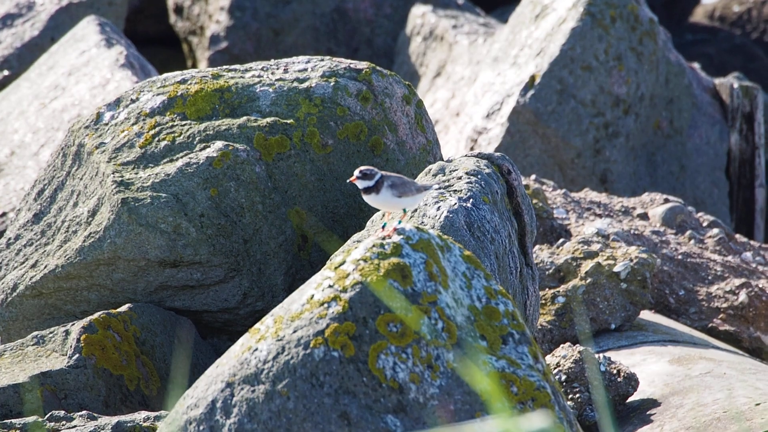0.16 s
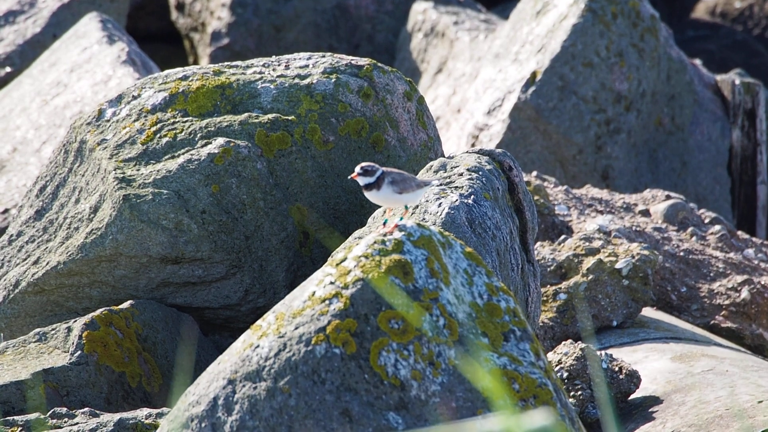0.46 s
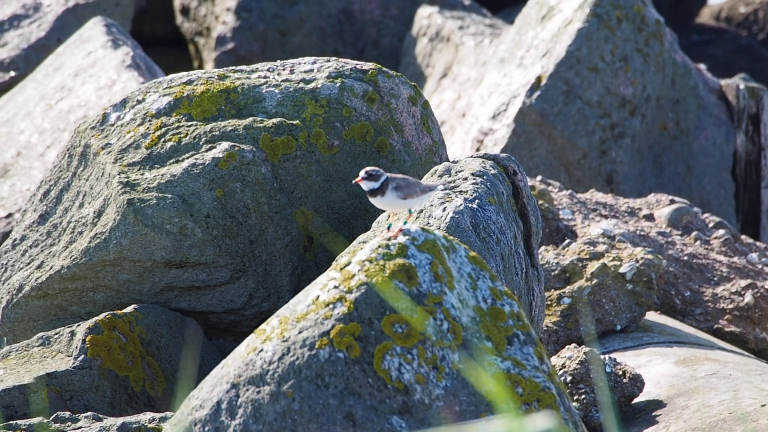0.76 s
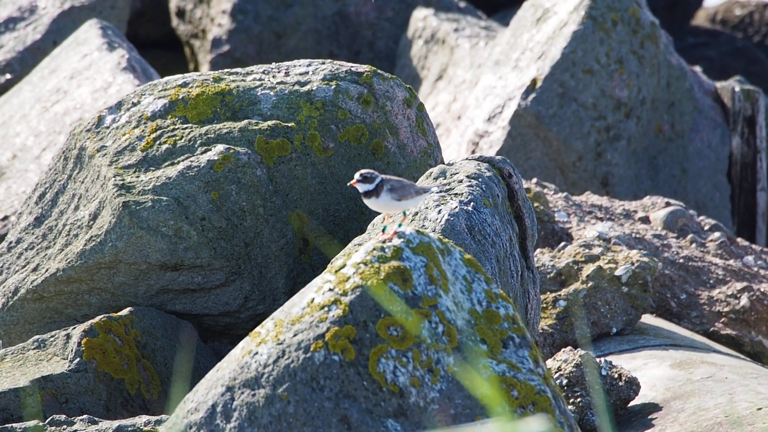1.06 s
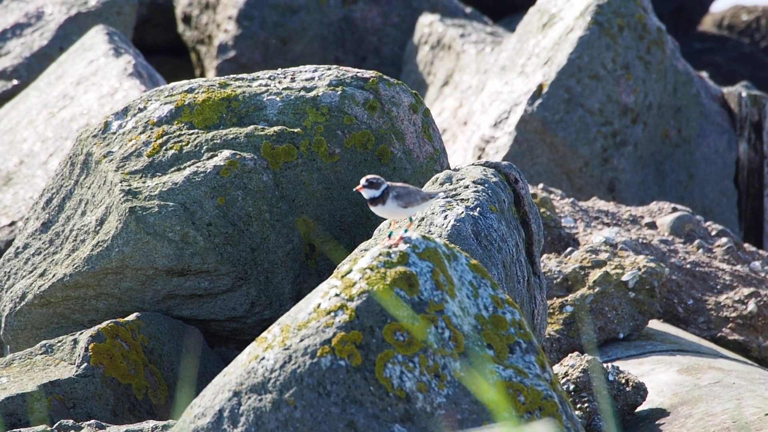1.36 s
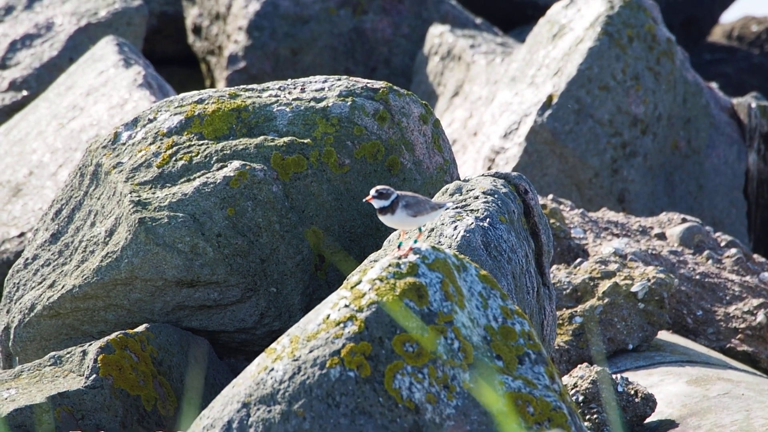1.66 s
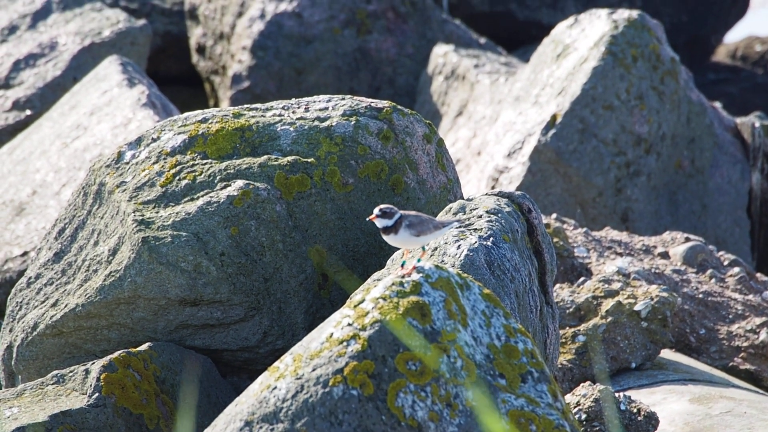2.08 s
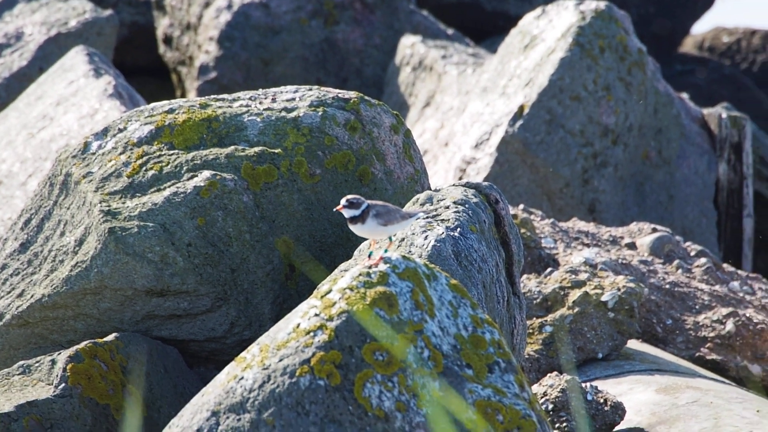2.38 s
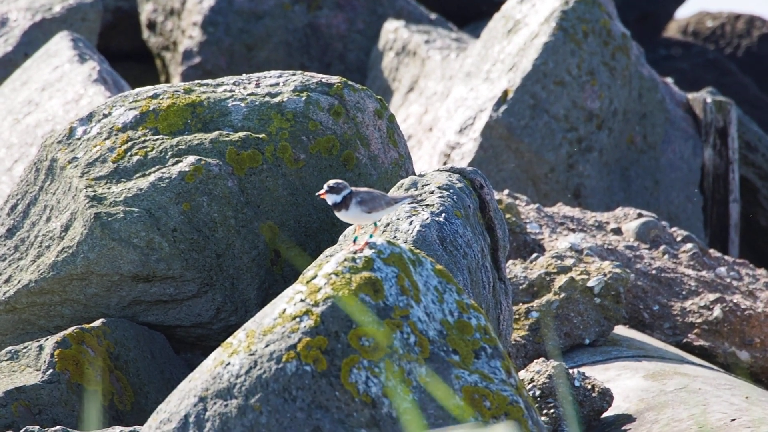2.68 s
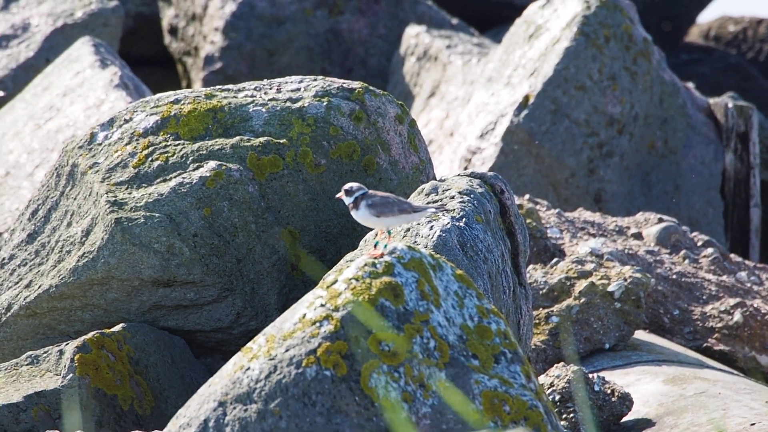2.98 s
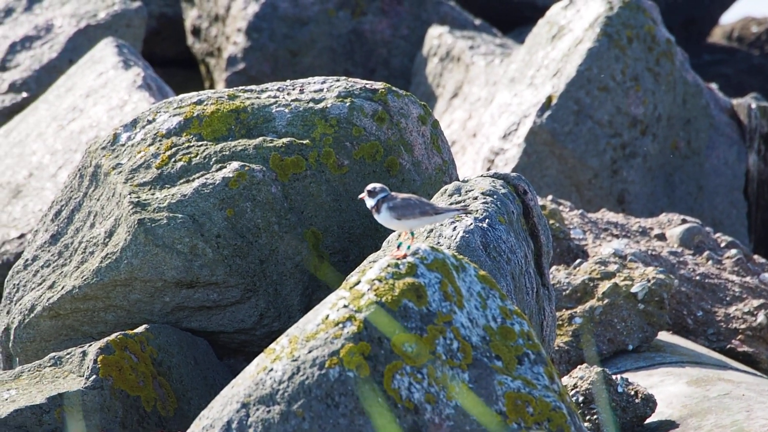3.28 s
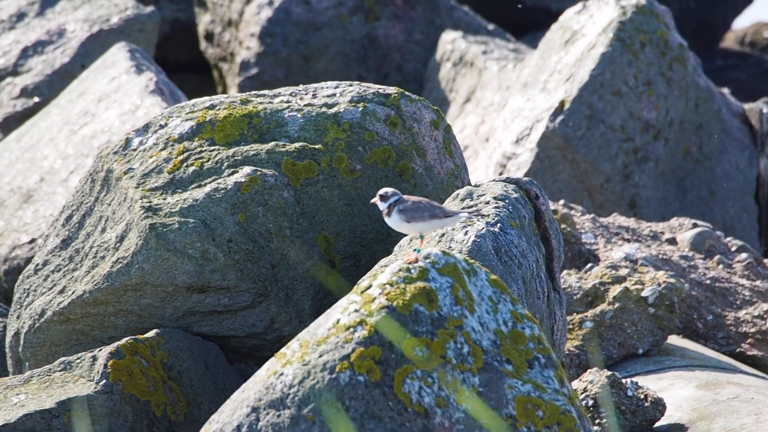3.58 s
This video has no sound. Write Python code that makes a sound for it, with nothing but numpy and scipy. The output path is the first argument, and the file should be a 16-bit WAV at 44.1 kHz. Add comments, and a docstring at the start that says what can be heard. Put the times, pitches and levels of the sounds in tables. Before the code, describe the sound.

Five clear, thin plover whistles, evenly spaced, above soft water wash and light wind bumps.

```python
"""A small plover on a rock whistles five alike calls, a few metres from a pair of microphones.
Each call is a gliding sine with a faint second partial; the stones around return delayed copies.
Water washes among the rocks: bands of noise that swell, with ticks and small drops as dying rings.
Light wind bumps the two microphone ports: low noise in gusts, with two single thumps."""
import sys
import numpy as np
from scipy import signal
from scipy.fft import rfft, irfft
from scipy.io import wavfile
from scipy.ndimage import uniform_filter1d

SR = 44100
rng = np.random.default_rng(int(sys.argv[2]) if len(sys.argv) > 2 else 0)


def output_pcm(signal):
    """Save a mono or channel-first signal as 16-bit PCM at the path in sys.argv[1].

    Samples are clipped to [-1, 1] before scaling.
    """
    pcm = np.clip(np.atleast_2d(signal).T, -1, 1) * 32767
    wavfile.write(sys.argv[1], SR, np.round(pcm).astype(np.int16))


N = 164934  # samples

# Wind gusts on the ports: start_s, level_db (before a 3 dB lift), left_minus_right_db
WIND_GUSTS = [(.86, -63, 4), (1.9, -71.5, -7), (2.3, -54.5, 7), (2.44, -61, -3), (2.53, -54, 16),
              (2.62, -67, 0), (2.82, -55.5, 8), (2.9, -46.5, 22), (3.11, -51.5, 20), (3.17, -60, 8),
              (3.5, -68, -2), (3.62, -55, -10)]
# Single bumps of wind: start_s, level_db (louder port, at the start), pitch_hz, left_minus_right_db
WIND_THUMPS = [(0.449, -30.5, 72, 22), (3.549, -35.5, 66, -16)]
# Colour of the water: pitch_hz, relative_level_db (per Hz)
WASH_COLOUR = [(25, -19), (125, -3), (205, -1), (260, -7), (350, -13.5), (540, -5), (790, -14.5),
               (1000, -9.5), (1300, -12), (1640, -20.5), (1950, -11.5), (2320, -18), (2950, -15),
               (5700, -19.5), (8000, -24.5), (15700, -30.5)]
# Swell of the water, each level used relative to its column mean: time_s, treble_db, middle_db
WASH_SWELL = [(.16, -58.5, -58.5), (.3, -58, -55.5), (.37, -58, -55.5), (1., -61, -56), (2.05, -58, -55.5),
              (2.9, -60.5, -56.5), (3.74, -58.5, -56)]
# How alike the water is at both microphones: pitch_hz, likeness (0-1)
WASH_LIKENESS = [(60, 1), (150, .68), (640, 0.46), (1400, 0.06), (3100, 0)]
# Side on which the water is louder: pitch_hz, left_minus_right_db
WASH_LEAN = [(200, -1), (700, -1.5), (1300, 2.1), (4400, 2), (15000, -2.2)]
# Ticks and drops that stand out: start_s, level_db (at the start), pitch_hz, left_minus_right_db, ring_cycles
WATER_TICKS = [(0.2382, -32, 4000, 17, 2.2), (.2624, -36, 6000, 3.5, 3), (0.273, -36, 4100, 15, 4.6),
               (0.295, -32, 4330, 15, 2.1), (.3060, -40, 3500, 11, 8.3), (0.317, -42, 5630, 3, 31),
               (.3960, -39, 5500, 1.5, 2.5), (0.4253, -38, 3280, -2, 17), (1.549, -36, 1560, 2, 2.6),
               (1.8336, -31.5, 5130, 6, 1.9), (2.21, -43, 1007, -4, 14), (2.5506, -35, 2910, 0, 13),
               (2.9592, -41, 2280, 0, 18), (3.1494, -42.5, 5530, 3, 9), (3.236, -47.5, 1436, 8, 12),
               (3.3904, -29.5, 3220, 11, 1.8), (3.5374, -41, 1980, 10, 7.1)]
# Turns of each call: start_s, step_up_s, first_swell_s, dip_s, second_swell_s, closing_drop_s
CALL_TURNS = [(.660, .717, .740, .755, .786, .803), (1.289, 1.350, 1.362, 1.385, 1.408, 1.432),
              (1.943, 2.004, 2.018, 2.040, 2.068, 2.092), (2.633, 2.690, 2.712, 2.730, 2.759, 2.781),
              (3.270, 3.338, 3.344, 3.362, 3.399, 3.414)]
# Pitch of each call: low_note_hz, first_swell_hz, dip_hz, second_swell_hz
CALL_PITCHES = [(2045, 2560, 2515, 2595), (2025, 2555, 2487, 2610), (2042, 2545, 2474, 2622),
                (2070, 2550, 2456, 2622), (2025, 2535, 2480, 2592)]
# Guide levels of each call, before the echoes: low_note_db, before_step_db, first_swell_db, dip_db,
# second_swell_db, second_swell_end_db, drop_db, second_partial_db (for a 2 kHz pitch)
CALL_LEVELS = [(-50, -41.5, -37, -52.5, -35.5, -39, -42, -66.5), (-52, -39.5, -38, -53, -37, -38, -41, -66),
               (-50, -40, -38, -53.5, -36, -36, -41, -64), (-47.5, -40, -36.5, -48.5, -34, -37, -42.5, -61),
               (-49.5, -38.5, -38, -54.5, -34.5, -54, -39.5, -67)]
# Paths by way of the stones, before the hollow colours them: lag_s, left_db, right_db
STONE_ECHOES = [(.0095, -1.5, -3), (0.0143, -5, -4), (.021, -20, -26), (.031, -10, -21)]
# Notches from the microphone housing: pitch_hz, width_hz, depth_db
HOUSING_NOTCHES = [(6590, 413, 12.5), (10430, 890, 13.5)]

WIND_HZ, WIND_WIDTH_HZ = 69, 48.5
WIND_PATCHY_DB = 3  # per unit of walk()
THUMP_CYCLES = 3.1
WASH_DB = -50  # rms over both channels
TICK_CRACK_DB = -15  # click in front of a tick, relative to its ring
DROPS_PER_S, DROPS_LOW_HZ, DROPS_HIGH_HZ = 260, 694, 5970
DROPS_DB, DROPS_SPREAD_DB = -57, 3.5  # level of the faintest; scale of the random lift above it
DROPS_CYCLES, DROPS_GLIDE = 5.35, .15
# A burst of fine crackle that leans left; its level is that of the faintest
CRACKLES, CRACKLE_S, CRACKLE_LENGTH_S = 36, .225, .11
CRACKLE_DB, CRACKLE_TOP_HZ = -49, 14300

SCOOP_S, SCOOP_HZ = .013, 250  # slide up into the low note
LIFT_S, LIFT_HZ, STEP_S = .022, 210, .007  # rise before the step, then the step itself
NULL_DB = -13  # brief dips in level at the step and before the drop, as when call and echo beat
DROP_S, DROP_TO_HZ, DROP_FADE_DB = .018, 1640, 11  # every call ends in a quick fall of pitch
OVERTONE_TILT_DB_PER_KHZ = -11.5  # the second partial is weaker for higher notes
WAVER, HOARSE_DB = .003, 1.5  # share of pitch, and level flutter, per unit of walk()
BEAK_DB, BEAK_HZ, BEAK_CYCLES = -45.5, 3250, 8  # a small click opens each call
BIRD_PAN_DB, RIGHT_LAG_S = 0, .00004
# A gap between the stones favours one band of the echoes
HOLLOW_HZ, HOLLOW_WIDTH_HZ, HOLLOW_CONTRAST_DB = 2230, 150, -7
WHINE_HZ, WHINE_DB = 15300, -81
START_S, OFFSET, TOP_HZ = .1565, -.0028, 15800


def undb(db):
    """Decibels to an amplitude factor."""
    return 10 ** (np.asarray(db) / 20)


def pan(x, db):
    """Two channels that differ by db, positive to the left."""
    return x * undb([[db / 2], [-db / 2]])


def walk(rate):
    """Random values 1 / rate s apart, of spread 1.2, joined by straight lines."""
    knots = rng.standard_normal(rate * 4 + 2)
    return 1.2 * np.interp(np.arange(N) * rate / SR, np.arange(rate * 4 + 2), knots)


def band(hz, width):
    """Noise in a bell-shaped band."""
    f = np.fft.rfftfreq(N, 1 / SR)
    inside = np.abs(f - hz) < 3 * width
    bell = np.exp(-((f[inside] - hz) / width) ** 2)
    spectrum = np.zeros(len(f), complex)
    spectrum[inside] = rng.standard_normal((inside.sum(), 2)) @ [1, 1j] * bell
    return irfft(spectrum, N)


def on_log(table, hz):
    """Read a two-column table along a logarithmic pitch axis."""
    pitches, values = np.array(table).T
    return np.interp(np.log(hz), np.log(np.maximum(pitches, 1)), values)


def add(out, at, db, hz, pan_db, cycles, glide, crack=0.):
    """Add a ring that decays over some cycles, its pitch rising by glide, with an optional click in front."""
    turn = np.arange(int(3 * cycles * SR / hz) + 4) * hz / SR
    ring = np.sin(2 * np.pi * turn * (1 + glide * turn / cycles)) * np.exp(-2 * turn / cycles)
    ring[1:4] += crack * np.array([1, -1, .5])
    i = int(at * SR)
    ring = ring[:N - i]
    out[:, i:i + len(ring)] += pan(ring * undb(db), pan_db)


def wind(t):
    """Low patchy rumble in gusts, unrelated on the two ports, and single bumps that ring briefly."""
    s, db, side = np.array(WIND_GUSTS).T
    ports = np.array([band(WIND_HZ, WIND_WIDTH_HZ) * undb(WIND_PATCHY_DB * walk(14)) for _ in range(2)])
    lean = undb(np.interp(t, s, side) * np.array([[.5], [-.5]]))
    lean = 2 * lean / np.hypot(*lean)  # leaning keeps the summed power
    out = ports / ports.std() * undb(np.interp(t, s, db)) * lean
    for at, db, hz, pan_db in WIND_THUMPS:
        add(out, at, db - abs(pan_db) / 2, hz, pan_db, THUMP_CYCLES, 0.)
    return out


def wash(t):
    """Moving water: noise bands a third of an octave apart that swell together and flicker alone."""
    s, treble, middle = np.array(WASH_SWELL).T
    treble = np.interp(t, s, treble - treble.mean())
    middle = np.interp(t, s, middle - middle.mean())
    out, ripple = 0, walk(8)
    for hz in 28 * 2 ** np.arange(0, 9.4, 1 / 3):
        treble_share = np.clip(np.log2(hz / 1200), 0, 1)
        swell = treble_share * treble + (1 - treble_share) * middle
        db = on_log(WASH_COLOUR, hz) + swell + .5 * ripple + .9 * walk(22)
        like = np.clip(on_log(WASH_LIKENESS, hz), -.9, .95)
        mid = np.sqrt(1 + like) * band(hz, hz / 5)
        side = np.sqrt(1 - like) * band(hz, hz / 5)
        pair = np.array([mid + side, mid - side])
        lean = undb(on_log(WASH_LEAN, hz) * np.array([[.5], [-.5]]))
        out = out + undb(db) * pair * lean
    return out * undb(WASH_DB) / out.std()


def drops():
    """Bubbles and drops as short rising rings, a few much louder; a burst of crackle and clicking ticks."""
    out = np.zeros((2, N))
    for at, pitch, size, side in rng.random((int(DROPS_PER_S * N / SR), 4)):
        hz = DROPS_LOW_HZ * (DROPS_HIGH_HZ / DROPS_LOW_HZ) ** pitch
        db = DROPS_DB - DROPS_SPREAD_DB * np.log(1 - .98 * size)
        add(out, at * N / SR, db, hz, 22 * (side - .4), DROPS_CYCLES, DROPS_GLIDE)
    for at, pitch, size in rng.random((CRACKLES, 3)):
        hz = 2000 * (CRACKLE_TOP_HZ / 2000) ** pitch
        db = CRACKLE_DB - 4 * np.log(1 - .76 * size)
        add(out, CRACKLE_S + at * CRACKLE_LENGTH_S, db, hz, 5, 4, 0.)
    for at, db, hz, pan_db, cycles in WATER_TICKS:
        add(out, at, db, hz, pan_db, cycles, .03, undb(TICK_CRACK_DB))
    return out


def among_stones(whistle):
    """The direct path to each microphone plus delayed copies, strongest near the hollow's pitch."""
    f = np.fft.rfftfreq(N, 1 / SR)

    def late(lag):
        """A delay, as a turn of phase that grows with frequency."""
        return np.exp(-2j * np.pi * f * lag)

    bell = np.exp(-((f - HOLLOW_HZ) / HOLLOW_WIDTH_HZ) ** 2)
    hollow = undb(HOLLOW_CONTRAST_DB * (1.5 - bell))
    left = late(0) * undb(BIRD_PAN_DB / 2)
    right = late(RIGHT_LAG_S) * undb(-BIRD_PAN_DB / 2)
    paths = np.array([left, right])
    for lag, left_db, right_db in STONE_ECHOES:
        paths = paths + hollow * late(lag) * undb([[left_db], [right_db]])
    return irfft(rfft(whistle) * paths, N)


def plover(t):
    """A nearly pure whistle: low note, step up, two swells, quick drop; nearby stones return it."""
    beak, whistle = np.zeros((2, N)), np.zeros(N)
    waver, flutter = 1 + WAVER * walk(150), walk(220)
    for turns, pitches, levels in zip(CALL_TURNS, CALL_PITCHES, CALL_LEVELS):
        start, step, swell1, dip, swell2, drop = turns
        low, high1, sag, high2 = pitches
        low_db, rise_db, swell1_db, dip_db, swell2_db, late_db, drop_db, upper_db = levels
        before, after, end = step - STEP_S / 2, step + STEP_S / 2, drop + DROP_S
        near = slice(int((start - .02) * SR), int((end + .02) * SR))
        now = t[near]

        pitch_points = [  # (s, Hz)
            (start, low - SCOOP_HZ), (start + SCOOP_S, low),
            (before - LIFT_S, low + 15), (before, low + LIFT_HZ), (after, high1 - 30),
            (swell1, high1), (dip, sag), (swell2, high2),
            (drop - .004, high2 - 70), (drop + .004, high2 - 240), (end, DROP_TO_HZ)]
        pitch = np.interp(now, *np.transpose(pitch_points))
        pitch = uniform_filter1d(pitch, size=130) * waver[near]

        level_points = [  # (s, dB)
            (start - .004, -120), (start + .0042, low_db - 1.5), (start + SCOOP_S, low_db),
            (step - .015, low_db + 2.5), (step - .009, rise_db), (before - .001, rise_db - 3),
            (step, rise_db + NULL_DB), (after + .00074, swell1_db - 4), (swell1, swell1_db),
            (dip - .006, dip_db - 5.5), (dip + .012, dip_db + 3),
            (swell2 - .004, swell2_db), (swell2 + .0078, swell2_db - .5), (drop - .005, late_db),
            (drop, late_db + NULL_DB), (drop + .0025, drop_db),
            (end, drop_db - DROP_FADE_DB), (end + .001, -120)]
        times, level_db = np.transpose(level_points)
        gain = np.interp(now, times, undb(level_db))
        hoarse = (now < step) | (now > drop)  # only the low note and the drop
        gain = gain * undb(flutter[near] * HOARSE_DB * hoarse)

        phase = 2 * np.pi * np.cumsum(pitch) / SR
        upper = undb(upper_db + OVERTONE_TILT_DB_PER_KHZ * (pitch - 2000) / 1000)
        upper = upper * np.interp(now, [start, start + .0079, drop - .01, drop], [0, 1, 1, 0])
        tone = uniform_filter1d(gain, size=90) * np.sin(phase) + upper * np.sin(2 * phase)
        whistle[near] += np.sqrt(2) * tone  # levels are rms
        add(beak, start, BEAK_DB, BEAK_HZ, BIRD_PAN_DB, BEAK_CYCLES, .1)
    return among_stones(whistle) + beak


def scene():
    """Wind, water and bird summed at the two microphones."""
    t = np.arange(N) / SR
    return wind(t) + wash(t) + drops() + plover(t)


def record(dry):
    """The housing notches the treble; a faint whine and an offset join; silence opens, top cut off."""
    t, f = np.arange(N) / SR, np.fft.rfftfreq(N, 1 / SR)
    dips = sum(db / (1 + (2 * (f - hz) / width) ** 2) for hz, width, db in HOUSING_NOTCHES)
    housed = irfft(rfft(dry) * undb(-dips), N)
    whine = undb(WHINE_DB) * np.sin(2 * np.pi * WHINE_HZ * t)
    sound = (housed + whine + OFFSET) * (t > START_S)
    top_cut = signal.ellip(10, .2, 70, TOP_HZ, fs=SR, output="sos")
    return signal.sosfilt(top_cut, sound)


dry = scene()
out = record(dry)
output_pcm(out)
```